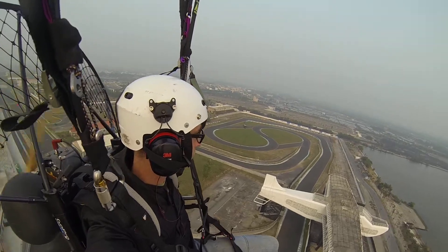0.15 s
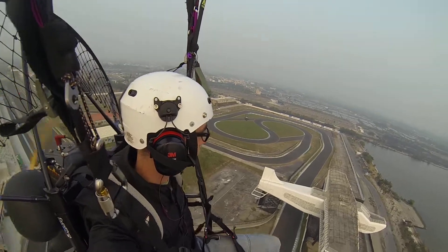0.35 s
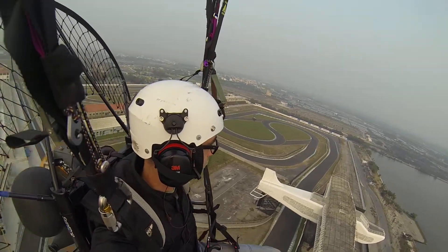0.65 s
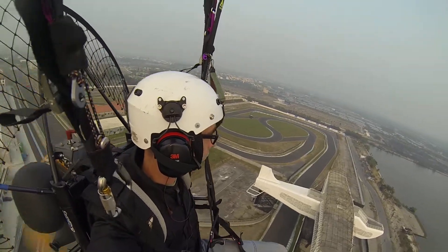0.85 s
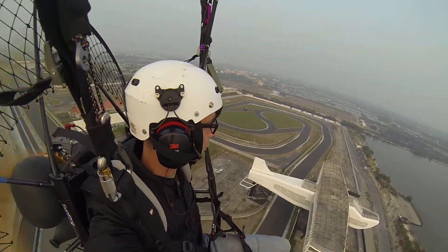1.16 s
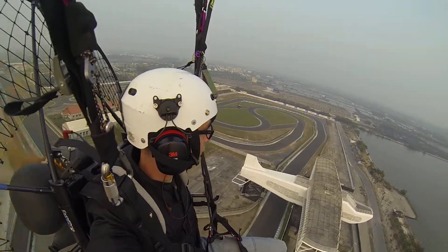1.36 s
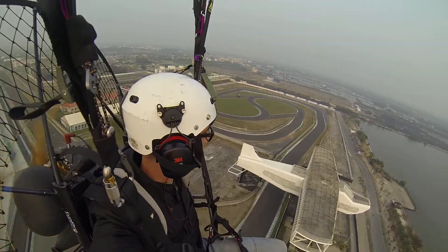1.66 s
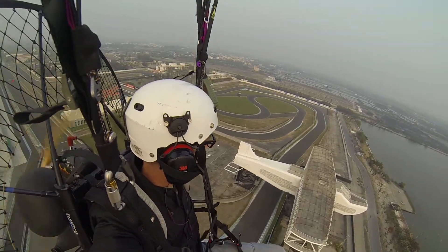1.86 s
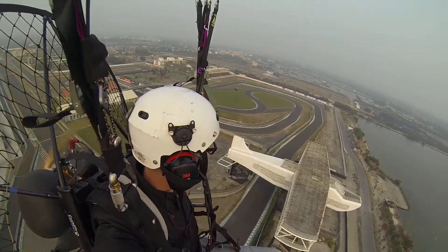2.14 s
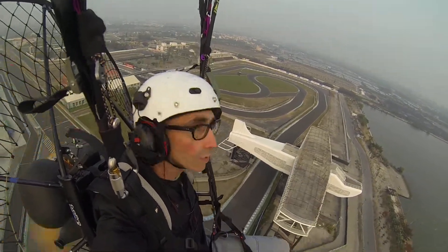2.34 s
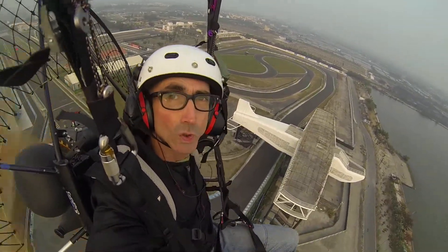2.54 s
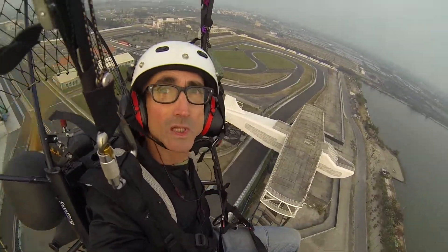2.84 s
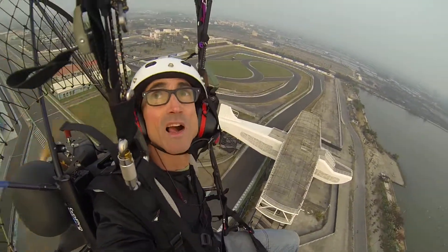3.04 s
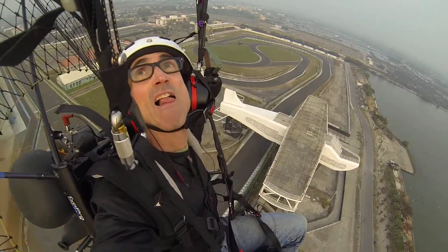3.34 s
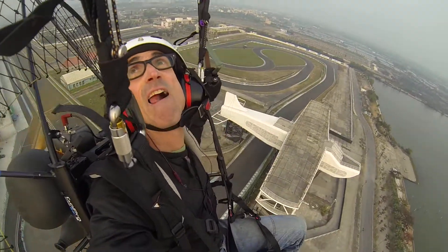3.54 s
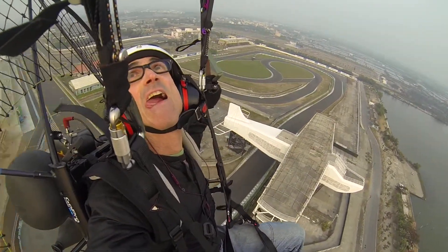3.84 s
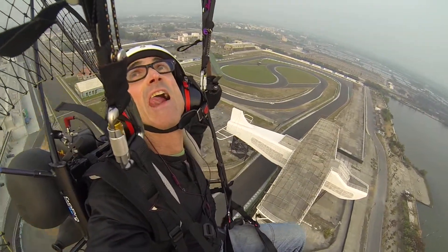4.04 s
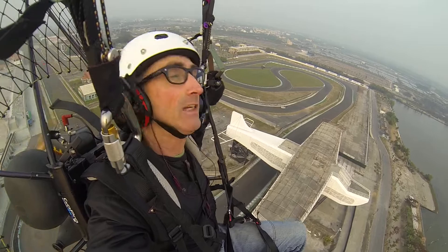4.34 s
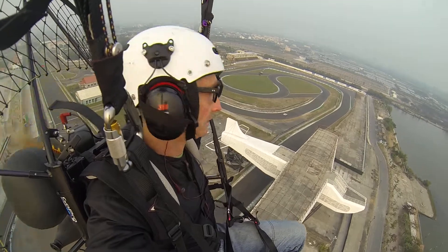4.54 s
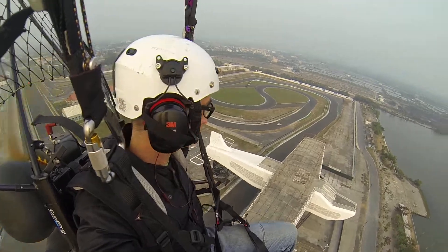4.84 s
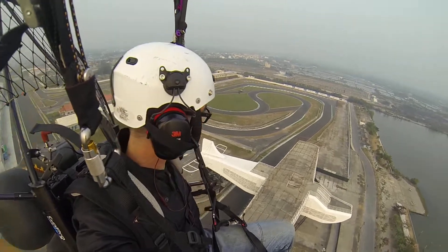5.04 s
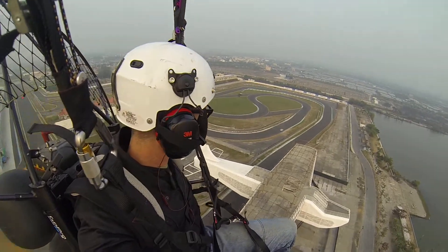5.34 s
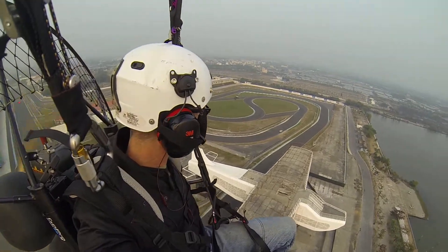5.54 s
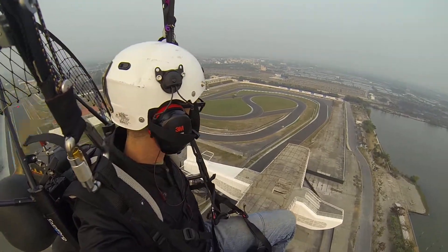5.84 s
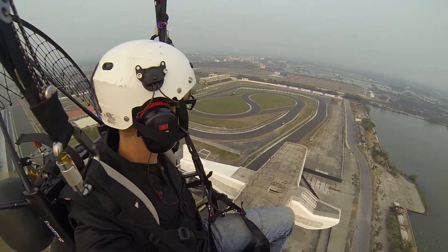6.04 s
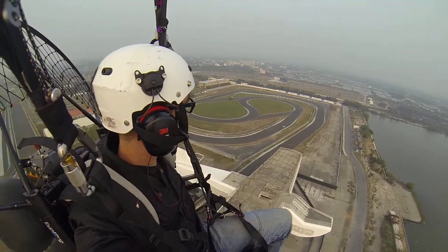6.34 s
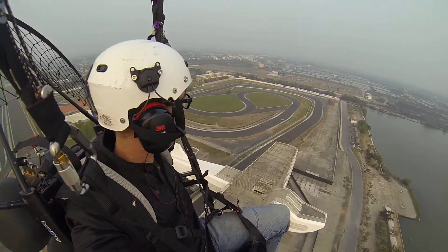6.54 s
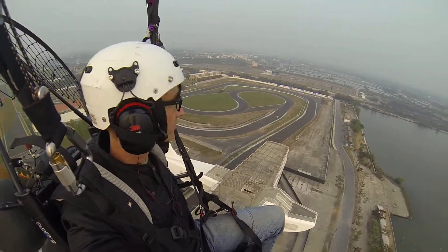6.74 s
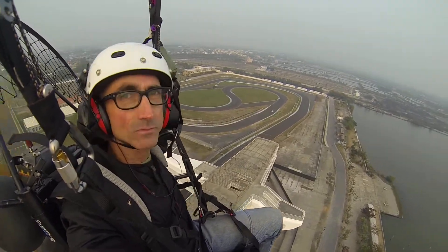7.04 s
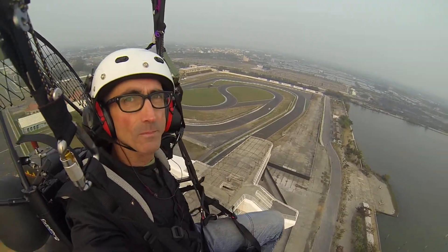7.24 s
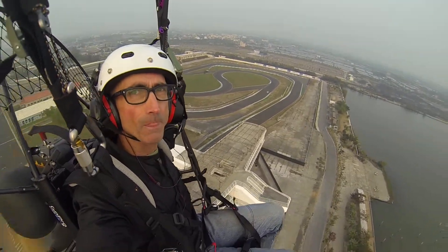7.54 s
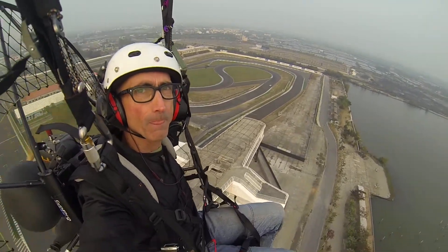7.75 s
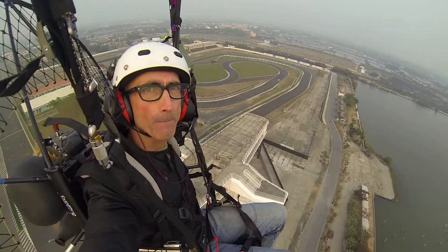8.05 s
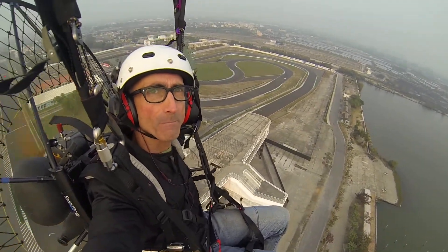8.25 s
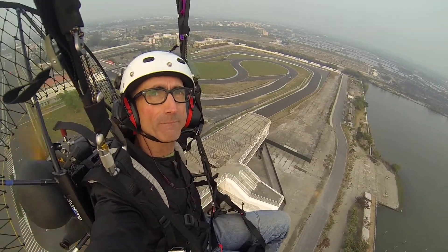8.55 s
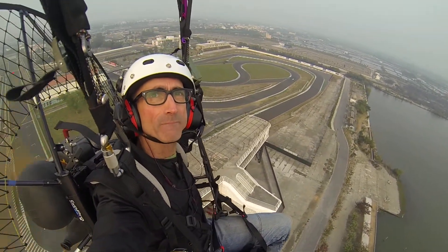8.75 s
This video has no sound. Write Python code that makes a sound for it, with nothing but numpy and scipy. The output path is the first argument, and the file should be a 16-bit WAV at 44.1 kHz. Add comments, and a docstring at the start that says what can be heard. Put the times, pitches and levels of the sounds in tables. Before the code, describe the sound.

In flight in the open air, a small two-stroke engine drones close by with a hard, boxy midrange rasp. The propeller adds a fast fluttering swish, a faint hiss and scattered brief slaps, while the airstream rumbles on the microphone. After about three seconds the engine settles a little lower and softer, then cruises on steadily to the end.

```python
"""Paramotor in cruise

A two-stroke engine fires once a turn and drives a propeller whose blades thrum, swish and slap.
The throttle eases a little halfway. A metre away, a camera's hard case resonates in the midrange,
colouring the rasp, swish and slaps, while the airstream buffets the microphone."""
import sys
import numpy as np
from scipy import signal
from scipy.fft import rfft, irfft, next_fast_len
from scipy.io import wavfile
from scipy.ndimage import map_coordinates

SR = 44100
rng = np.random.default_rng(int(sys.argv[2]) if len(sys.argv) > 2 else 0)


def put_to_file(sound):
    """Save the sound as 16-bit audio at rate SR, in the file named by the first command-line argument."""
    columns = np.atleast_2d(sound).T  # one column per channel
    safe = np.clip(columns, -1, 1)
    whole_steps = np.round(safe * 32767)
    wavfile.write(sys.argv[1], SR, whole_steps.astype(np.int16))


N = 392049

# shaft rates; the throttle eases from 3 to 4.5 s and the belt creeps: t/s, firing f/Hz, blade-pass f/Hz
SHAFT_RATES = [(0.0, 96.92, 49.76), (0.7, 95.97, 49.3), (1.4, 96.04, 49.32), (2.1, 95.57, 48.99),
               (2.95, 95.18, 48.89), (4.55, 91.38, 46.4), (5.0, 92.33, 46.62), (6.1, 92.12, 46.84),
               (6.7, 92.43, 46.77), (7.6, 92.11, 46.72), (8.89, 91.33, 46.22)]


def amp(db):
    """Amplitude ratio of a level in decibels."""
    return 10 ** (np.asarray(db) / 20)


def unit(x):
    """Normalisation to rms 1."""
    return x / np.sqrt(np.mean(x ** 2) + 1e-20)


def curves(rows):
    """Linear interpolation in time of each later column, one value a sample."""
    times, *columns = np.transpose(rows)
    return [np.interp(np.arange(N) / SR, times, column) for column in columns]


def wobble(knots_per_s):
    """Slow random modulation: a spline through Gaussian values."""
    at = np.linspace(0, N * knots_per_s / SR, N // 100)
    coarse = map_coordinates(rng.standard_normal(int(at[-1]) + 4), [at])
    return np.interp(np.linspace(0, at[-1], N), at, coarse)


def speed_level(layer, cruise_hz=96):
    """Radiation grows with engine speed: a layer's level in dB is linear in the firing rate."""
    # by layer: level at cruise/dB, slope/(dB/Hz)
    speed_laws = {"second order": (-31, 0.56), "upper orders": (1.35, 0.59), "rasp": (-34.5, 0.47),
                  "swish": (-22.5, 0.31), "tips": (-47.5, 1.0)}
    cruise_db, db_per_hz = speed_laws[layer]
    firing_hz, _ = curves(SHAFT_RATES)
    return cruise_db + db_per_hz * (firing_hz - cruise_hz)


def order_tone(turns, order, level_db, waver_db):
    """A shaft order: a sinusoid at a whole multiple of the rate, its level wavering."""
    return np.sqrt(2) * amp(level_db + waver_db * wobble(12)) * np.cos(2 * np.pi * order * turns)


def pulses(turns, jitter_s, scatter_db):
    """A band-limited impulse train: one windowed sinc a turn, irregular in time and size."""
    at = np.interp(np.arange(1, int(turns[-1])), turns, np.arange(N))
    chance = rng.standard_normal((len(at), 2))
    at += jitter_s * SR * chance[:, 0]
    sizes = amp(scatter_db * chance[:, 1:])
    taps = at.astype(int)[:, None] + np.arange(-7, 9)
    offset = taps - at[:, None]
    shape = np.sinc(offset) * np.cos(np.pi * offset / 16) ** 2
    return np.bincount(np.clip(taps, 0, N - 1).ravel(), (shape * sizes).ravel(), N)


def response(hz, spectrum, resonances):
    """Source and filter add in decibels: bell-shaped resonances on a broad spectrum."""
    knot_hz, knot_db = np.transpose(spectrum)
    peaks = sum(db * .5 ** ((2 * (hz - centre) / width) ** 2) for centre, width, db in resonances)
    return np.interp(np.log(hz + 1), np.log(knot_hz), knot_db) + peaks


def through_case(x, spectrum):
    """A minimum-phase filter imposes a source's spectrum and the resonances of the case."""
    # resonances and antiresonances: f/Hz, width/Hz, gain/dB
    case_modes = [(1161, 186, 7), (1294, 146, 12.5), (1488.3, 192, 16.5), (1656.6, 211, 10.5),
                  (1940, 280, -3.5), (2047, 260, 3.5), (2330, 140, -5), (2584, 160, 4.5),
                  (2840, 117, -16.5), (3200, 150, 5.5), (3544, 450, 8), (4420, 120, -10), (4850, 720, 4.5),
                  (6640, 320, -6), (6770, 150, 4.5), (10900, 1000, 4.5), (13800, 700, 5)]
    m = 2 * next_fast_len(N // 2 + 4096)
    gain_db = response(np.fft.rfftfreq(m, 1 / SR), spectrum, case_modes)
    cepstrum = irfft(np.log(amp(gain_db)), m)
    cepstrum[1:m // 2] *= 2  # folding the cepstrum makes the filter causal
    cepstrum[m // 2 + 1:] = 0
    return irfft(rfft(x, m) * np.exp(rfft(cepstrum)), m)[:N]


def exhaust_drone(turns):
    """Periodic outflow of gas radiates at the firing rate and its octave."""
    # first order: t/s, level/dB
    drone_levels = [(0, -31.5), (1.4, -38.5), (2.3, -28), (3.0, -33.5), (7.1, -32), (7.5, -26.5),
                    (8.89, -26.5)]
    first_db, = curves(drone_levels)
    first = order_tone(turns, 1, first_db, waver_db=1.23)
    return first + order_tone(turns, 2, speed_level("second order"), waver_db=0.4)


def tuned_pipe(turns):
    """Resonance: an upper order sings as the engine speed slides it through a mode of the pipe."""
    # exhaust spectrum ahead of the pipe: f/Hz, relative level/dB
    exhaust_spectrum = [(280, -45), (380, -43), (475, -46), (555, -51.5), (720, -48), (1000, -53),
                        (1060, -42), (1700, -42), (1850, -59), (3700, -61)]
    # pipe resonances: f/Hz, width/Hz, gain/dB
    pipe_modes = [(1154, 63, 9.5), (1461, 63, 9), (1621.5, 64, 11), (1996, 194, 13), (2146, 76, 1),
                  (2400, 80, 7.5), (2603, 45, 15), (3645, 170, 15.5)]
    firing_hz, _ = curves(SHAFT_RATES)
    speeds = np.linspace(firing_hz.min(), firing_hz.max(), 40)
    load_db = speed_level("upper orders")
    crank = turns + 0.0025 * wobble(25)  # uneven burning shakes the crank, blurring the high orders
    song = np.zeros(N)
    for order in range(3, 40):
        pipe_db = np.interp(firing_hz, speeds, response(order * speeds, exhaust_spectrum, pipe_modes))
        song += order_tone(crank + rng.random(), order, load_db + pipe_db, waver_db=2.0)
    return song


def firing_rasp(turns):
    """Impulsive excitation: the port cracks open; piston and intake answer later in the turn."""
    # spectrum of a blow: f/Hz, relative level/dB
    blow_spectrum = [(150, -23), (500, -20), (1000, -9), (1500, -2.5), (2100, 6.5), (3400, 4.5),
                     (5000, -11), (8000, -17.5), (15000, -43)]
    blows = pulses(turns, jitter_s=.00005, scatter_db=1.0)
    blows += .5 * pulses(turns - .21, jitter_s=.0001, scatter_db=0.0)
    blows += .73 * pulses(turns - .62, jitter_s=.00015, scatter_db=2.0)
    return amp(speed_level("rasp")) * unit(through_case(blows, blow_spectrum))


def blade_thrum(passes):
    """Each blade sends a pressure dip, whose second harmonic beats against the firing rate."""
    # fundamental: t/s, relative level/dB
    thrum_levels = [(0, -31), (1.7, -35), (2.1, -29), (2.9, -33.5), (4.0, -26), (4.9, -25.5), (5.6, -36),
                    (7.6, -31), (8.0, -29), (8.89, -31)]
    # upper harmonics: multiple of the blade rate, level/dB
    harmonics = [(2, -39), (3, -46.5), (4, -57), (5, -52), (6, -53.5), (7, -47), (9, -54), (11, -51),
                 (12, -57), (14, -68)]
    thrum_db, = curves(thrum_levels)
    upper = sum(order_tone(passes, order, db, waver_db=2.0) for order, db in harmonics)
    return -order_tone(passes, 1, thrum_db - .7, waver_db=2.0) - upper


def blade_noise(passes, rise, fall, steady, scatter_db):
    """Amplitude modulation: noise swells and fades at each blade; rise and fall are in passes."""
    nearest = np.round(passes).astype(int)
    size = amp(scatter_db * rng.standard_normal(1000))[nearest]
    angle = passes - nearest
    swell = np.exp(-.5 * (angle / np.where(angle < 0, rise, fall)) ** 2)
    return rng.standard_normal(N) * np.hypot(steady, size * swell)


def propeller_turbulence(passes):
    """Turbulence radiates broadband noise: the blades swish, the wake hisses, the fast tips chuff."""
    # source spectra: f/Hz, relative level/dB
    swish_spectrum = [(40, -12), (120, -1.5), (400, -0.5), (900, -1), (1500, -1), (2300, -2), (3500, -5.5),
                      (4500, -16.5), (7000, -30.5), (15000, -56)]
    wake_spectrum = [(2000, -14), (4000, -1), (5000, -2), (6000, 2), (7500, -3.5), (10000, -18.5),
                     (12500, -17.5), (15000, -20)]
    tip_spectrum = [(2500, -11.5), (4000, -16), (5400, 4.5), (6500, -8), (8000, -12), (9200, -9),
                    (10500, -20.5), (15000, -27)]
    # hiss of the wake: t/s, level/dB
    wake_levels = [(0, -41), (1.0, -43.7), (2.6, -45), (3.2, -44.5), (4.3, -45.7), (8.89, -46)]
    wake_db, = curves(wake_levels)
    swish = blade_noise(passes, rise=.14, fall=.12, steady=.7, scatter_db=2.0)
    wake = blade_noise(passes, rise=.18, fall=.13, steady=1.25, scatter_db=4.0)
    tips = blade_noise(passes, rise=.082, fall=.12, steady=.07, scatter_db=2.0)
    return (amp(speed_level("swish")) * unit(through_case(swish, swish_spectrum))
            + amp(wake_db) * unit(through_case(wake, wake_spectrum))
            + amp(speed_level("tips")) * unit(through_case(tips, tip_spectrum)))


def wind_buffet():
    """Eddies in the airstream press on the microphone as low-frequency pressure fluctuations."""
    # wind strength: t/s, relative level/dB
    gusts = [(0, -33), (1.0, -30.5), (1.9, -30.5), (3.3, -23.5), (4.4, -28), (6.0, -26), (7.2, -29.5),
             (8.89, -31.5)]
    # pressure spectrum: f/Hz, relative level/dB
    buffet_spectrum = [(5, -3), (14, 4.5), (30, -1), (45, -9.5), (70, -19.5), (150, -25.5), (400, -66.5)]
    gust_db, = curves(gusts)
    eddies = amp(2.6 * wobble(18))
    rumble = through_case(rng.standard_normal(N), buffet_spectrum)
    return amp(gust_db + 1.5) * unit(eddies * rumble)


def blade_slaps(passes, hard_db, light_db):
    """Blade-vortex interaction: sharp pushes ring the case, lightly once a turn, now and then hard."""
    # hard slaps: t/s, peak level/dB relative to hard_db
    hard_slaps = [(0.379, -4), (1.052, -8), (1.1325, -6.5), (1.2511, -8), (1.6188, -6.5), (2.311, -9),
                  (2.4343, -5), (3.254, -4.5), (3.712, -7), (4.475, -10), (4.992, -7), (5.9554, -12),
                  (6.593, -8), (6.766, -6.5), (6.8267, -5), (6.8322, -7), (6.9173, -8)]
    # spectrum of a slap: f/Hz, relative level/dB
    slap_spectrum = [(200, -8), (700, -12), (1350, 1), (1700, -5.5), (2300, -14.5), (3500, -30),
                     (6000, -32), (15000, -55)]
    propeller_turns = (passes + .1) / 2  # two blades
    pushes = amp(light_db) * pulses(propeller_turns, jitter_s=0.001453, scatter_db=2.0)
    for time_s, db in hard_slaps:
        pushes[round(time_s * SR)] += amp(db + hard_db)
    impulse_peak = np.abs(through_case(signal.unit_impulse(N), slap_spectrum)).max()
    return through_case(pushes, slap_spectrum) / impulse_peak


def scene():
    """Superposition of engine, propeller and wind; each shaft's phase is the integral of its rate."""
    turns, passes = np.cumsum(curves(SHAFT_RATES), axis=1) / SR
    crank = turns + .15
    engine = exhaust_drone(crank) + tuned_pipe(crank) + firing_rasp(crank)
    propeller = blade_thrum(passes + .1) + propeller_turbulence(passes)
    slaps = blade_slaps(passes, hard_db=-2.2, light_db=-18.5)
    return (engine + propeller + slaps + wind_buffet())[None]


def record(dry):
    """An ideal low-pass filter: the camera passes nothing above its band limit."""
    limit_hz = 15200
    m = next_fast_len(N + SR // 2)
    passband = np.fft.rfftfreq(m, 1 / SR) < limit_hz
    return irfft(rfft(dry, m) * passband, m)[..., :N]


dry = scene()
out = record(dry)
put_to_file(out)
```